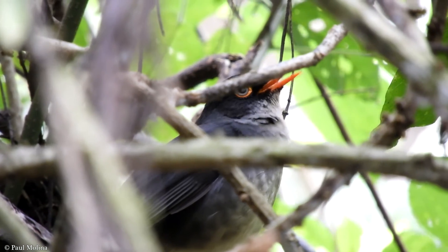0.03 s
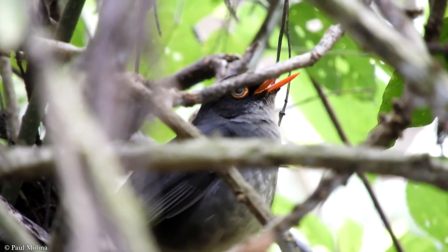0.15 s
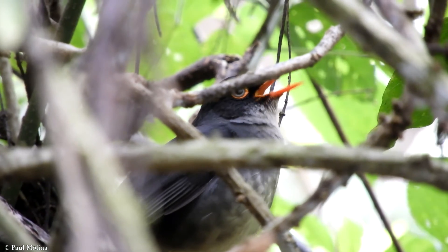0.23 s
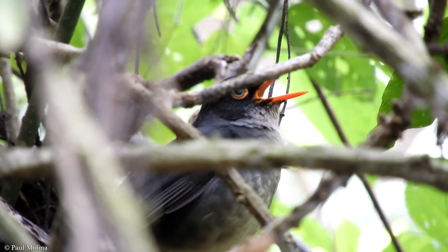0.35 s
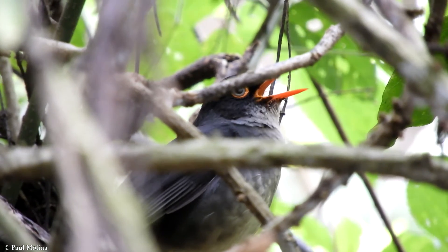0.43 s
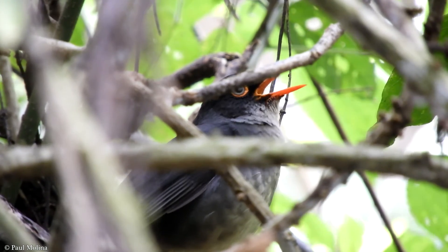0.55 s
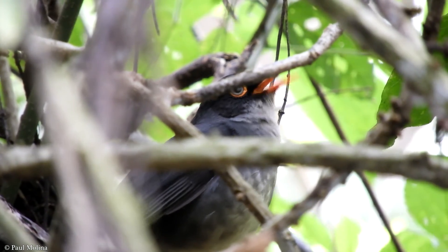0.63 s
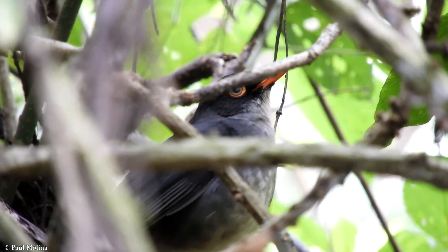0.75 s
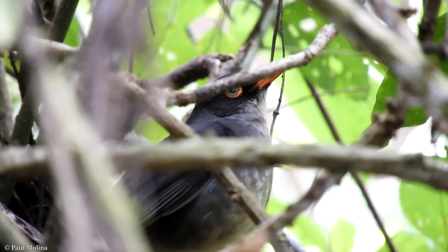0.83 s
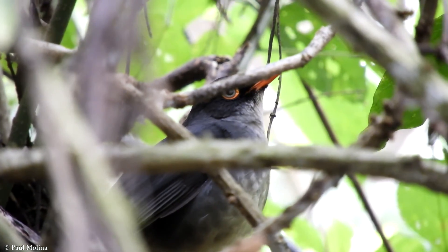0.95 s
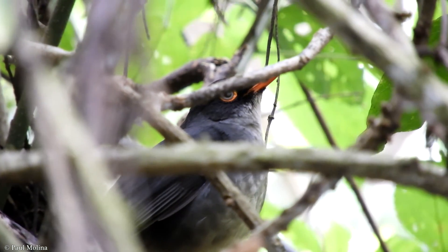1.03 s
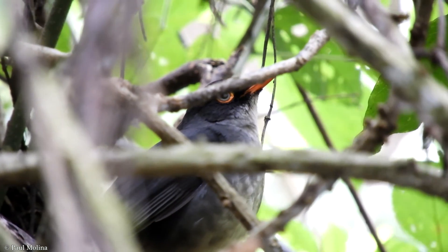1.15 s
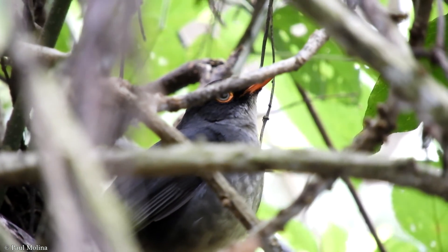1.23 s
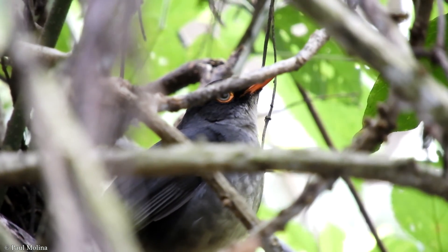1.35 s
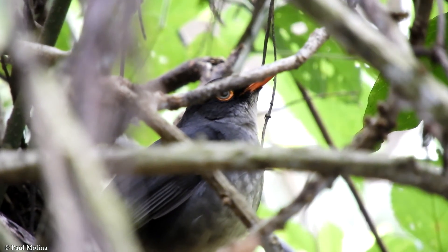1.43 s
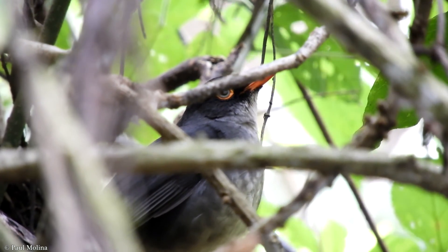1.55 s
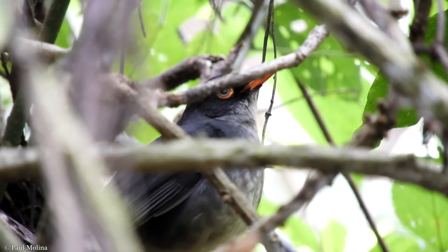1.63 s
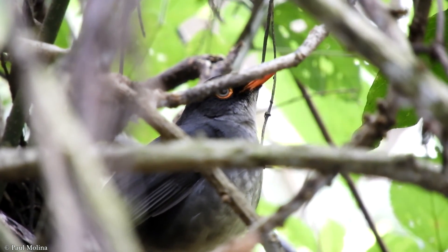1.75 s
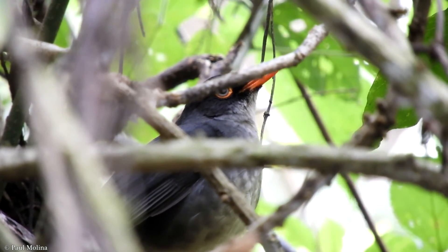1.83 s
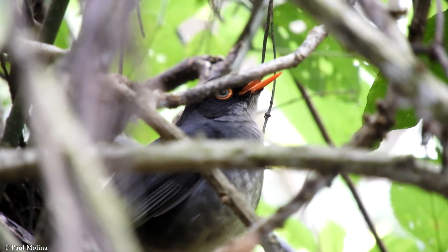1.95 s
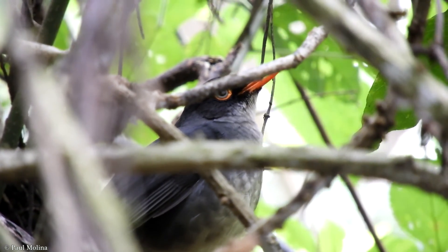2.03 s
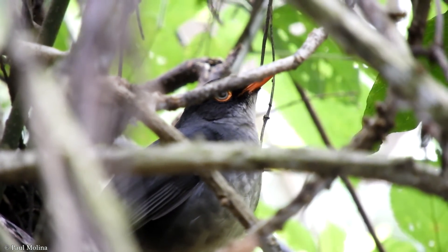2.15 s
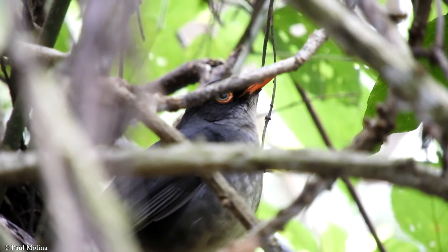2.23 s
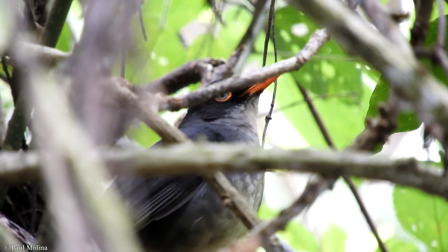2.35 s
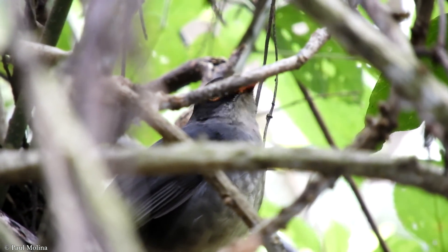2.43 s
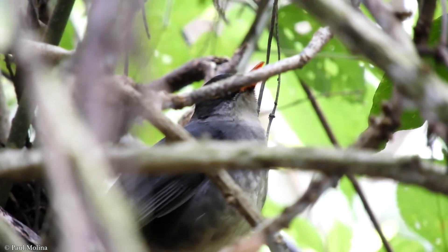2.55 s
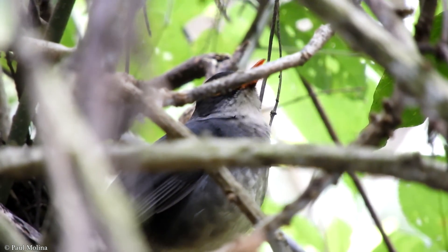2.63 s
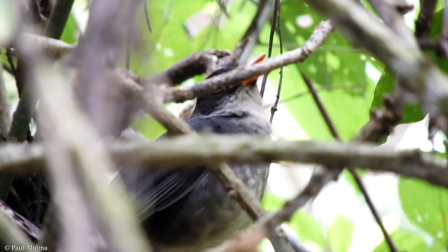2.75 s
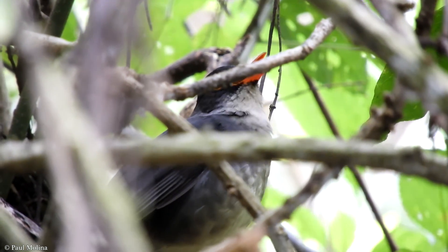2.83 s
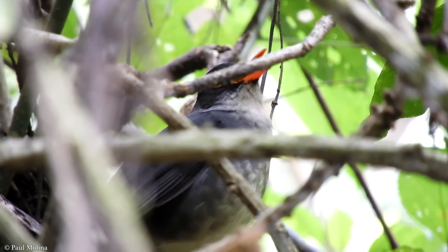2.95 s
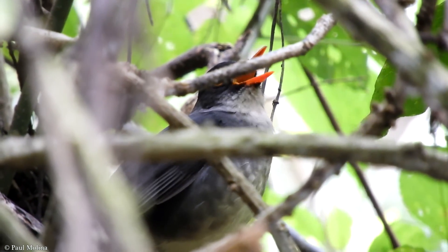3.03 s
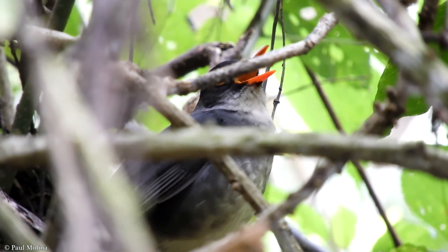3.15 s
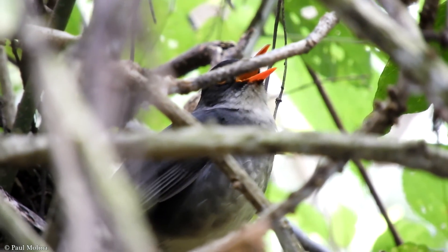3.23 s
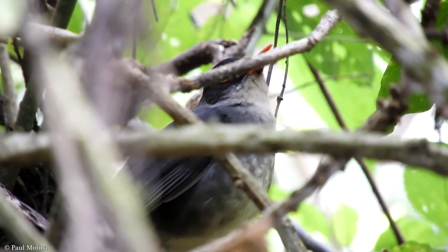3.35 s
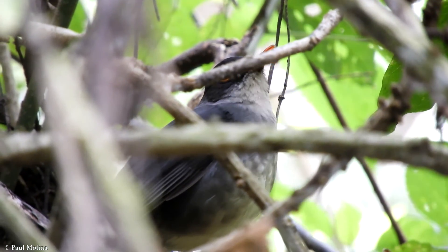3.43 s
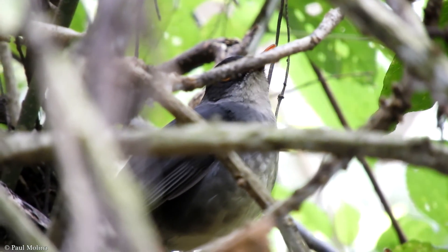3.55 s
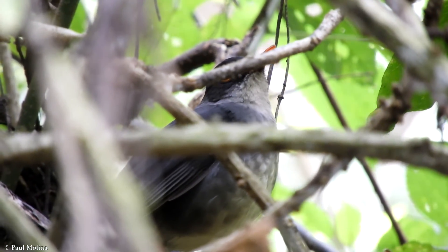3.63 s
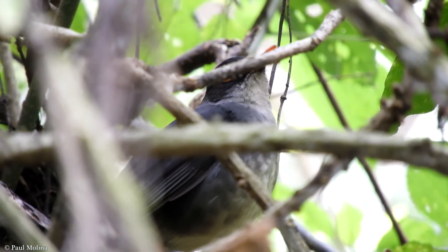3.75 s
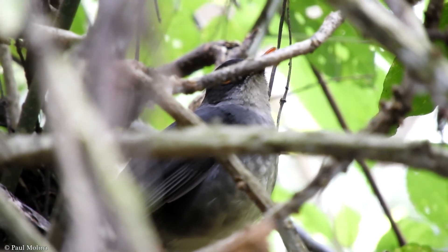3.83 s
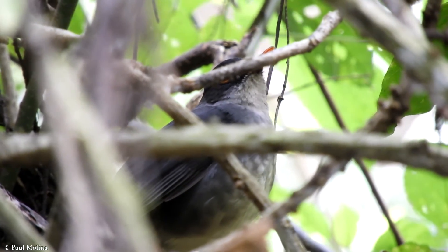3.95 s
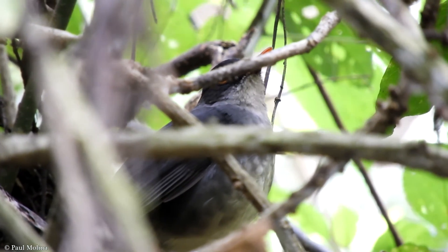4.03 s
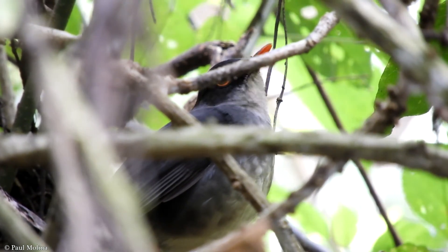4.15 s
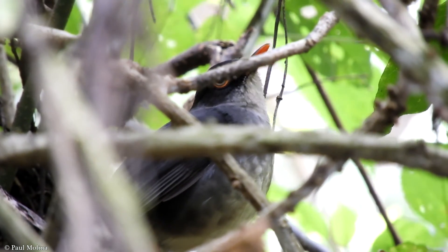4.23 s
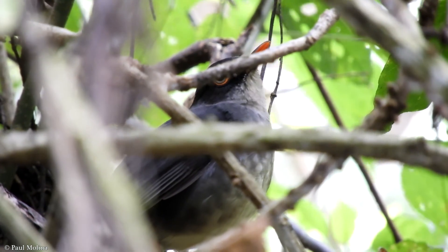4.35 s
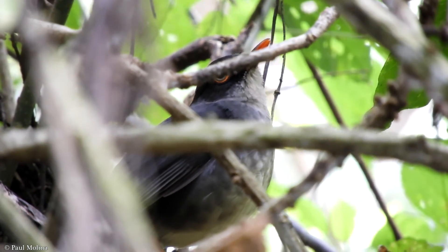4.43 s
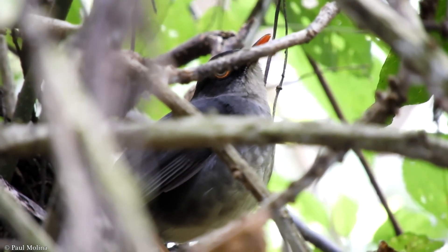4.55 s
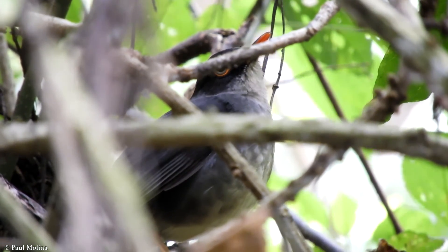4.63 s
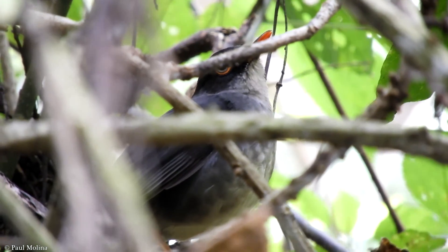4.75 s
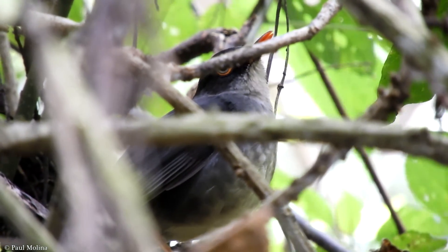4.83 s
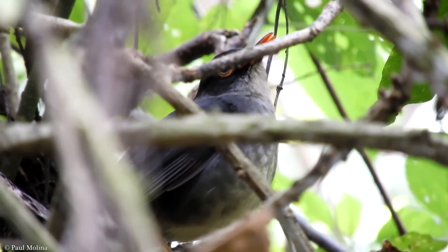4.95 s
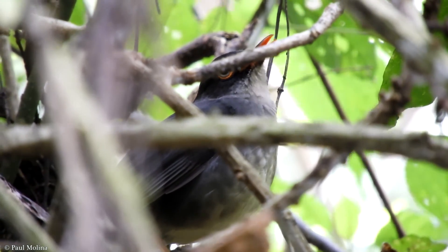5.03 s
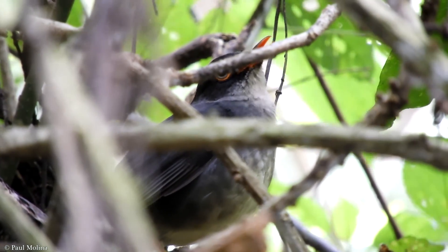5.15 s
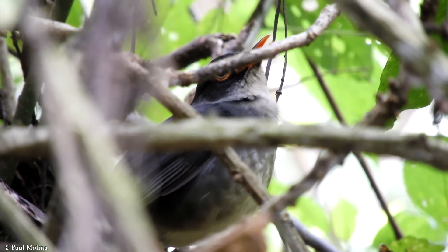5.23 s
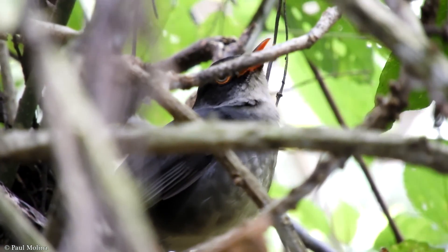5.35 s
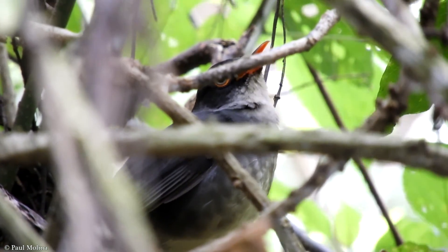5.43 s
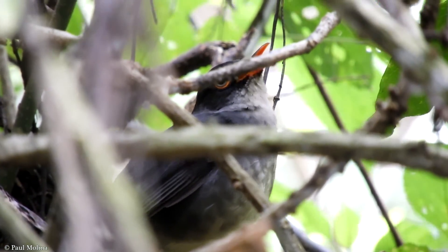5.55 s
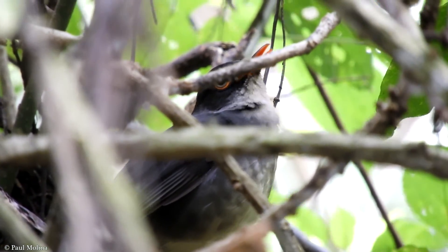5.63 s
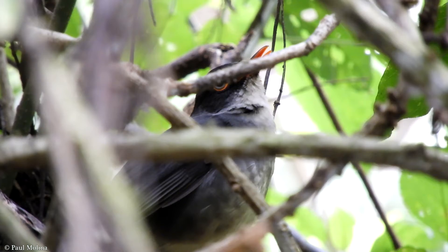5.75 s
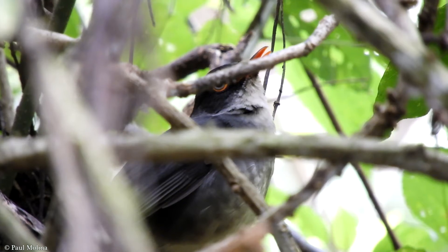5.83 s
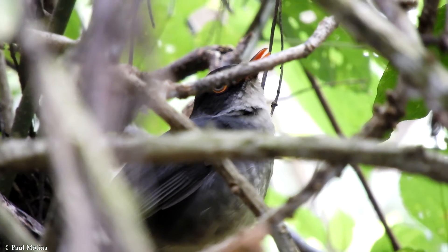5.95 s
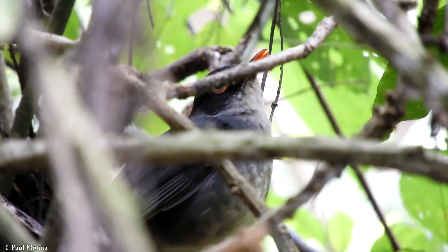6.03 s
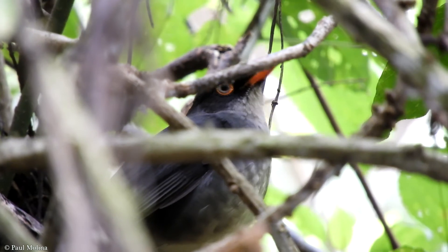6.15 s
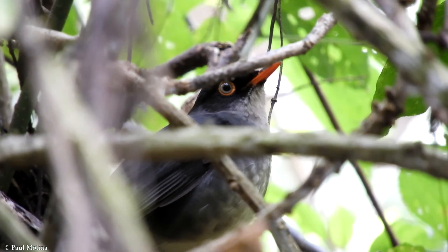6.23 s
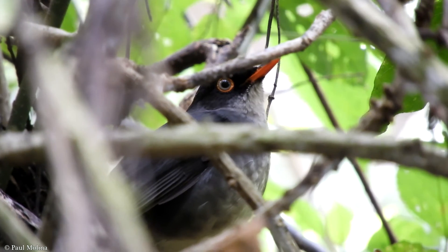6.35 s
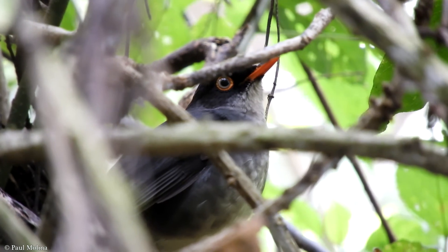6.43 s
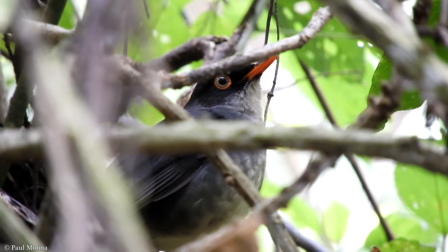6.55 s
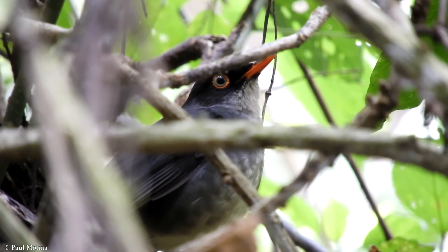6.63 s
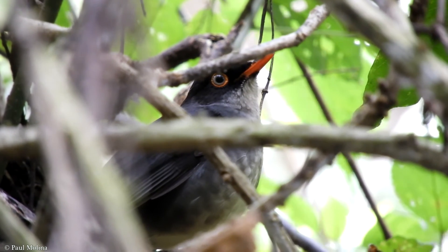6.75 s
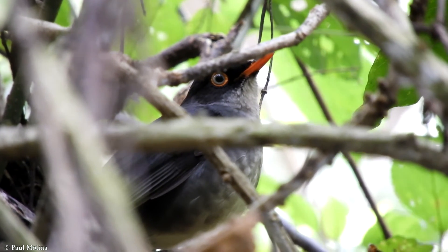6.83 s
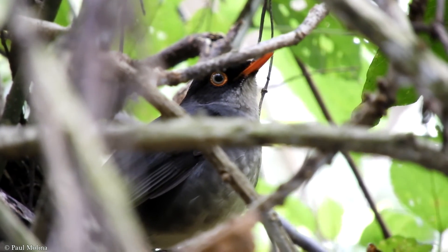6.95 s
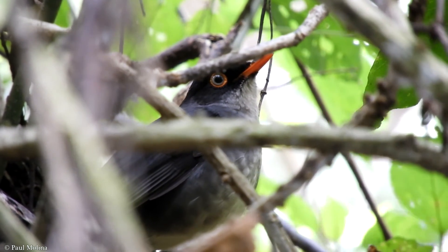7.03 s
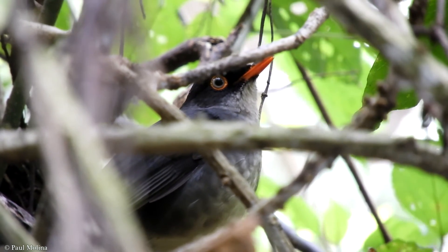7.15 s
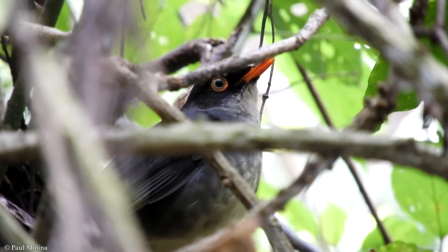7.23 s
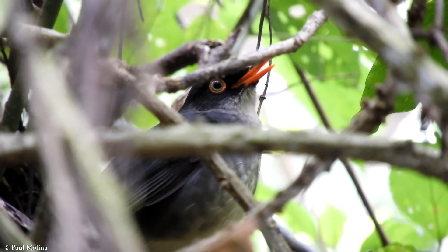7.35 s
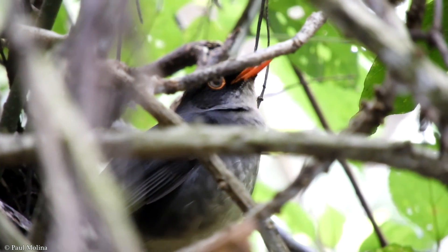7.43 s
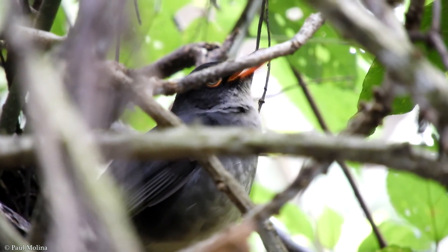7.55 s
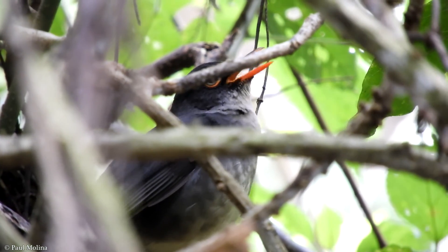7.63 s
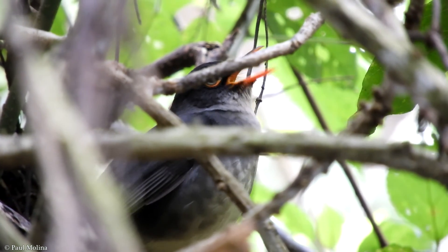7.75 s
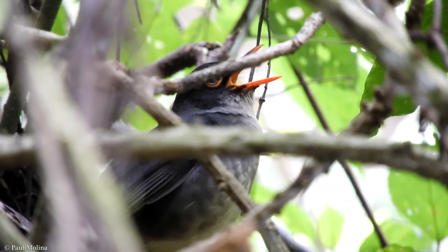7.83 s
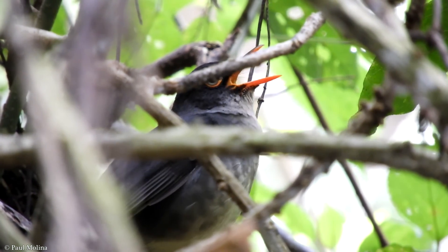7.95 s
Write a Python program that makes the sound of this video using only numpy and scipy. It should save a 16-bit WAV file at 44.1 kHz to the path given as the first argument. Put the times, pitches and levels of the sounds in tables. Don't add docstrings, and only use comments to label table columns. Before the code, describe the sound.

A woodland stream runs throughout as a steady, slightly fluttering hiss with tiny bright splashes and soft bubbling gurgles. At 0 s a near thrush gives quick pips and two throbbing, upward-hooked chirps around 3 kHz, then from 0.35 to 0.8 s one louder, clear whistle near 3.6 kHz, swelling, breaking up and sagging slightly. A small bird adds a faint buzz and a thin high rising slide at 0.5-0.8 s. Water alone follows until the thrush repeats pips, hooks and a fluttering whistle at 2.75-3.5 s. A short falling buzz comes at 4.4 s. From 5.15 to 6.1 s a fainter, further thrush answers with plain, lower notes, dropping to 2.2 kHz, alongside another thin high rise. Water again until 7.5 s, when the near thrush restarts; its whistle from 7.85 s grows strongest and is cut off at 8 s. Short woodland echoes, wide stereo, softened extreme treble.

```python
import sys
import numpy as np
from scipy import signal
from scipy.fft import rfft, irfft, next_fast_len
from scipy.io import wavfile
from scipy.ndimage import uniform_filter1d

SR = 44100
rng = np.random.default_rng(int(sys.argv[2]) if len(sys.argv) > 2 else 0)


def to_wav(s):
    ch = np.atleast_2d(s).T
    pcm = np.round(np.clip(ch, -1, 1) * 32767)
    wavfile.write(sys.argv[1], SR, pcm.astype(np.int16))


def invert_db(level):
    return 10 ** (np.asarray(level, dtype=float) / 20)


N = 352359
TIME = np.arange(N) / SR
STEP_S = .002
PAN_DB = -2.5

OVERTONES_DB = (-32, -26)
# f/Hz, density/dB per Hz
STREAM = [(13, -51), (22, -18), (27, -13), (79, 0), (162, -4), (238, -6.5), (315, -14), (663, -4.5),
          (1130, -8), (1670, -6.5), (2150, -10.5), (2850, -7), (6640, -8.5), (8580, -4), (10000, -11.5),
          (13000, -41), (22000, -120)]


def on_log(table, hz):
    at, value = np.transpose(table)
    return np.interp(np.log(hz + 1), np.log(at + 1), value)


def walk(rate):
    levels = rng.standard_normal(int(N / SR * rate) + 2)
    return 1.14 * np.interp(TIME * rate, np.arange(len(levels)), levels)


def sing(notes, overtones_db, waver, fade_s, rough, waver_hz=90):
    gain = np.zeros((2, N))
    for note in notes:
        s, _, db, pan_db = np.transpose(note)
        span = slice(int(s[0] * SR), int(s[-1] * SR))
        pan = np.interp(TIME[span], s, pan_db) / 2
        gain[:, span] = invert_db(np.interp(TIME[span], s, db) + np.array([pan, -pan]))
    gain = uniform_filter1d(gain, int(fade_s * SR), axis=1)
    on = gain[0] > 1e-7
    s, hz, _, _ = np.transpose(np.concatenate(notes))
    pitch_hz = np.interp(TIME[on], s, hz) * (1 + waver * walk(waver_hz)[on])
    phase = 2 * np.pi * np.cumsum(pitch_hz) / SR
    effort = abs(gain[:, on].mean(axis=0)) / gain.max()
    tone = np.zeros(N)
    tone[on] = np.sin(phase)
    for k, db in enumerate(overtones_db):
        tone[on] += invert_db(db) * effort ** 0.4 * np.sin((k + 2) * phase)
    return np.sqrt(2) * tone * gain * (1 + rough * np.array([walk(200), walk(200)]))


def swell(t, swells):
    # t/s, depth/0-1
    dropouts = [(.191, 0.74), (.391, 0.8), (.637, .95), (2.918, .7), (3.068, 0.7), (3.187, 0.7),
                (3.223, .95), (5.52, .9), (5.61, .8), (7.69, .8)]
    dropout_s = .006
    s, half, db, pan_db = np.transpose(swells)[:, :, None]
    lobes = invert_db(db) * np.cos(np.pi / 2 * np.clip((t - s) / half, -1, 1)) + 1e-6
    at, depth = np.transpose(dropouts)[:, :, None]
    notches = np.clip(depth, 0, .99) * np.exp(-((t - at) / dropout_s) ** 2)
    kept = np.prod(1 - notches, axis=0)
    total = lobes.sum(axis=0)
    return 20 * np.log10(kept * total), (lobes * pan_db).sum(axis=0) / total


def hook(s, hz, *throbs_db):
    drop_hz, rise_s = 160, .017
    throb_s, lead_s, lead_db = .022, .03, -12
    throb_half_s = (0.0087, 0.014, 0.019)
    throb_pan_db = (-5, -1.5, -0.5)
    t = np.arange(s - lead_s, s + 2 * throb_s + throb_half_s[-1], STEP_S)
    throbs = [(s + k * throb_s, throb_half_s[k], db, throb_pan_db[k]) for k, db in enumerate(throbs_db)]
    lead = (s - lead_s / 2, lead_s / 2, throbs_db[0] + lead_db, PAN_DB)
    return np.transpose([t, hz - drop_hz * np.exp((s - t) / rise_s), *swell(t, [lead] + throbs)])


def pip(s, half, db, hz):
    t = np.arange(s - half, s + half, STEP_S)
    return np.transpose([t, hz + 0 * t, *swell(t, [(s, half, db, PAN_DB)])])


def thrush_hooks():
    # first throb t/s, top f/Hz, three throb levels/dB rms
    hook_table = [
        (.084, 3030, -37.5, -37.5, -33.5),
        (.178, 2982, -33, -38, -33),
        (2.811, 3010, -36, -36, -35),
        (2.907, 2968, -31.5, -32, -34),
        (7.583, 3010, -36, -35, -33.5),
        (7.68, 3002, -32, -33, -29),
    ]
    # centre t/s, half length/s, level/dB rms, f/Hz
    pip_table = [(0.014, .012, -46, 3060), (0.042, .018, -39.5, 3100), (.249, .011, -46, 2985),
                 (2.76, .013, -37.5, 3115), (2.877, .016, -42, 3020), (2.979, .011, -45, 2975),
                 (7.51, .02, -45, 2990), (7.545, .014, -44, 3025), (7.8, .035, -50, 2960)]
    climbing = sing([hook(*r) for r in hook_table], OVERTONES_DB, .005, .004, .14, waver_hz=200)
    return climbing + sing([pip(*r) for r in pip_table], (), .006, .004, .2)


def whistle(s, hz, hold_s, sag_hz_per_s, lowest_hz):
    # centre t/s, half length/s, level/dB rms, left minus right/dB
    head_swells = [(0.341, .015, -42, 0), (0.369, 0.025, -29, -5), (.428, 0.036, -20.5, 1.5),
                   (.49, 0.044, -20, 0), (.535, 0.014, -27, -9), (0.565, .028, -23, -8),
                   (.609, 0.029, -22, -3.5), (0.647, .01, -31.5, -7), (0.67, .012, -32, -1),
                   (0.697, 0.021, -27.5, -3.5), (.726, 0.0091, -32.5, -5), (.766, .016, -47, -7),
                   (.794, .012, -49, -4), (3.04, .012, -42, -8), (3.059, .014, -30, -2),
                   (3.088, 0.026, -26.5, -4), (3.122, 0.031, -25, -8), (3.165, 0.025, -24, -8.5),
                   (3.204, 0.018, -21.5, -3), (3.244, 0.031, -29, -4), (3.301, .04, -32.5, -3),
                   (3.353, 0.029, -23.5, -5.5), (3.405, 0.043, -30, -1), (3.478, 0.023, -44.5, -5),
                   (7.827, 0.011, -46, -4), (7.852, 0.021, -35.5, -4.5), (7.888, 0.024, -25.5, -2.5),
                   (7.924, 0.033, -22.5, 2.5), (7.966, 0.023, -22, -4), (8.0, 0.029, -14.5, -4)]
    scoop_hz, scoop_s, whistle_s = 170, .017, .49
    t = np.arange(0, min(whistle_s, N / SR - s + STEP_S), STEP_S)
    held = np.maximum(hz - sag_hz_per_s * np.maximum(t - hold_s, 0), lowest_hz)
    return np.transpose([s + t, held - scoop_hz * np.exp(-t / scoop_s), *swell(s + t, head_swells)])


def thrush_whistles():
    # start t/s, top f/Hz, hold/s, sag/Hz per s, lowest f/Hz
    whistle_table = [
        (0.329, 3605, .2, 600, 3495),
        (3.031, 3562, .12, 400, 3472),
        (7.82, 3598, .2, 600, 3495),
    ]
    return sing([whistle(*r) for r in whistle_table], OVERTONES_DB, .0013, .003, .06, waver_hz=300)


def reply(s, length_s, from_hz, to_hz, settle_s):
    # centre t/s, half length/s, level/dB rms, left minus right/dB
    far_swells = [(5.192, .025, -50, -5), (5.357, 0.052, -42, -3), (5.412, 0.037, -41.5, 2),
                  (5.465, 0.051, -39, 3), (5.548, 0.043, -46.5, -15), (5.596, .012, -39.5, -2),
                  (5.634, 0.025, -40.5, 2), (5.667, .01, -45, -3), (5.695, .015, -54, -5),
                  (5.75, 0.025, -43.5, -12), (5.788, .025, -43, -5), (5.83, 0.026, -42.5, -2),
                  (5.992, .022, -42, -7), (6.022, .028, -44.5, -6), (6.057, .025, -45, -4)]
    t = np.arange(0, length_s, STEP_S)
    return np.transpose([s + t, to_hz + (from_hz - to_hz) * np.exp(-t / settle_s), *swell(s + t, far_swells)])


def far_thrush():
    # start t/s, length/s, from f/Hz, to f/Hz, settling/s
    reply_table = [
        (5.16, .06, 2810, 2720, 0.031),
        (5.31, .27, 2670, 2648, 0.041),
        (5.58, .14, 2650, 2760, 0.027),
        (5.725, .145, 2320, 2203, .025),
        (5.968, .122, 2226, 2218, .04),
    ]
    return sing([reply(*r) for r in reply_table], (), .003, .006, .12)


def slide(s, length_s, from_hz, to_hz, db, bend=1, crest=0.54, edge_db=-8):
    part = np.arange(0, length_s, STEP_S) / length_s
    away = np.where(part < crest, 1 - part / crest, (part - crest) / (1 - crest))
    hz = from_hz + (to_hz - from_hz) * part ** bend
    return np.transpose([s + part * length_s, hz, db + edge_db * away ** 2, PAN_DB + 0 * part])


def small_bird():
    # start t/s, length/s, from f/Hz, to f/Hz, level/dB rms
    rising = [
        (.55, .23, 8500, 9850, -51.5),
        (5.12, .18, 8850, 9620, -52),
    ]
    low_end = [
        (.63, .1, 4540, 4290, -47),
    ]
    falling = [
        (.5, .12, 6150, 4650, -52),
        (4.385, .18, 5850, 4320, -47.5),
    ]
    clear = sing([slide(*r) for r in rising], (), .006, .01, .45)
    clear = clear + sing([slide(*r) for r in low_end], (), .004, .01, .15)
    buzz_notes = [slide(*r, bend=.6, crest=.8, edge_db=-6) for r in falling]
    return clear + sing(buzz_notes, (), .038, .01, .5, waver_hz=450)


def echoes(dry, level_db, t60_s, gap_s):
    t = TIME[:int(.6 * SR)]
    common, own = rng.standard_normal(len(t)), rng.standard_normal((2, len(t)))
    tail = (common + 0.81 * own) * invert_db(-60 * t / t60_s) * (t > gap_s)
    tail *= invert_db(level_db) / np.sqrt(np.sum(tail ** 2, axis=1, keepdims=True))
    return dry + signal.oaconvolve(dry, tail, axes=1)[:, :N]


def stream():
    # f/Hz, share/0-1
    likeness = [(60, 0.9), (130, 0.83), (270, 0.89), (560, 0.82), (1180, 0.94), (2480, 0.98), (5230, 0.93),
                (11000, 0)]
    # f/Hz, left minus right/dB
    balance_db = [(60, -5.8), (190, -5.8), (340, -4.8), (610, -2.4), (1090, -.8), (1940, -.5), (3460, -2),
                  (6170, -3.8), (11000, -2)]
    level_db, lag_s = -40.5, -0.000023
    size = next_fast_len(N)
    hz = np.arange(size // 2 + 1) * SR / size
    db = on_log(STREAM[:-2], hz)
    like = np.clip(on_log(likeness, hz), 0, 1)
    left, own = rfft(rng.standard_normal((2, size)))
    right = (like * left + np.sqrt(1 - like ** 2) * own) * np.exp(+2j * np.pi * hz * lag_s)
    pan = on_log(balance_db, hz) / 2
    pair = np.array([left * invert_db(db + pan), right * invert_db(db - pan)])
    out, surge, splash = 0, walk(10), walk(22)
    for step in np.arange(2, 10, .5):
        band = np.clip(1 - 2 * abs(np.log2(np.maximum(hz, 100) / 25) - step), 0, 1)
        swing_db = (.5 * surge + .5 * splash) * step / 9 + 1.09 * walk(11)
        out = out + irfft(pair * band, size)[:, :N] * invert_db(swing_db)
    return out * invert_db(level_db) / np.std(out.mean(axis=0))


def splashes():
    # t/s, peak level/dB, centre f/Hz
    single = [(0.1456, -24.5, 6110), (1.1049, -28, 5370), (1.4571, -31, 6480), (1.9305, -44, 8390),
              (2.2662, -24.5, 8280), (2.7172, -29, 4700), (3.014, -38, 4140), (3.5493, -25.5, 9100),
              (3.901, -25, 8690), (4.128, -27.5, 4510), (4.2988, -27, 5270), (4.3809, -27, 5680),
              (4.584, -28, 8160), (5.5124, -43, 5160), (6.0766, -39, 8590), (6.2657, -37, 7400),
              (6.6483, -37, 4710), (7.2015, -26, 8670), (7.5368, -26, 4980), (7.8446, -30, 7960)]
    per_s = 45
    chance = rng.random((int(per_s * N / SR), 3))
    small = [(a * N / SR, -46 - 2.9 * np.log(b + 0.034), 1500 * 2 ** (2.58 * c)) for a, b, c in chance]
    out, t = np.zeros((2, N)), TIME[:int(.05 * SR)]
    for s, db, hz in small + [(s, db - 11.0, hz) for s, db, hz in single]:
        noise = rng.standard_normal((3, len(t)))
        burst = (noise[0] + 0.64 * noise[1:]) * np.e * t / 0.0058 * np.exp(-t / 0.0061)
        edges_hz = [hz / 2.0, min(hz * 1.76, 10000)]
        burst = signal.lfilter(*signal.butter(2, edges_hz, "band", fs=SR), burst)
        i = int(s * SR)
        out[:, i:i + len(t)] += (invert_db(db) * burst)[:, :N - i]
    return out * invert_db(np.array([[-1.3], [1.3]]))


def add_bubble(out, s, db, hz, cycles, glide):
    turns = np.arange(int(4 * cycles * SR / hz)) * hz / SR
    ring = np.sin(2 * np.pi * turns * (1 + glide * turns / cycles)) * np.exp(-turns / cycles)
    ring *= 1 - np.exp(-turns / 0.5)
    i = int(s * SR)
    out[i:i + len(ring)] += (invert_db(db) * ring)[:N - i]


def bubbles():
    # t/s, peak level/dB, f/Hz
    gurgles = [(0.247, -40, 970), (1.275, -42, 220), (1.687, -44, 890), (2.135, -36.5, 654),
               (3.386, -31, 772), (4.102, -39.5, 597), (4.839, -41, 231), (4.9, -38, 840), (5.04, -39, 648),
               (5.115, -37.5, 915), (5.267, -35, 950), (6.12, -37.5, 750), (5.799, -38, 810),
               (6.374, -36, 853), (7.095, -31.5, 884), (7.56, -37.5, 576)]
    per_s = 120
    out = np.zeros(N)
    when, pitch, loudness = rng.random((int(per_s * N / SR), 3)).T
    pitch_hz = 300 * 2 ** (3.6 * pitch)
    level_db = -48 - 4.0 * np.log(loudness + 0.019) + on_log(STREAM, pitch_hz)
    for s, db, hz in zip(when * N / SR, level_db, pitch_hz):
        add_bubble(out, s, db, hz, cycles=6.25, glide=0.047)
    for s, db, hz in gurgles:
        add_bubble(out, s, db - 0.5, hz, cycles=7.8, glide=0.019)
    return out * invert_db(np.array([[-1.2], [1.2]]))


def scene():
    near = echoes(thrush_hooks(), -7, 0.28, 0.0061)
    long_notes = echoes(thrush_whistles() + far_thrush(), -12, 0.28, 0.0064)
    high = echoes(small_bird(), -1, .25, 0.0047)
    return near + long_notes + high + stream() + bubbles() + splashes()


def band_limit(x):
    return signal.sosfilt(signal.butter(12, 15700, fs=SR, output="sos"), x)


def record(dry):
    # f/Hz, level/dB
    camera_top = [(10000, 0), (11000, -8.5), (11600, -12), (12000, -27), (12600, -27), (12900, -14.5),
                  (14500, -25), (15600, -28)]
    size = next_fast_len(N)
    top = invert_db(on_log(camera_top, np.arange(size // 2 + 1) * SR / size))
    dull = irfft(rfft(dry, size) * top, size)[:, :N]
    return band_limit(dull - 0.0018)


dry = scene()
out = record(dry)
to_wav(out)
```